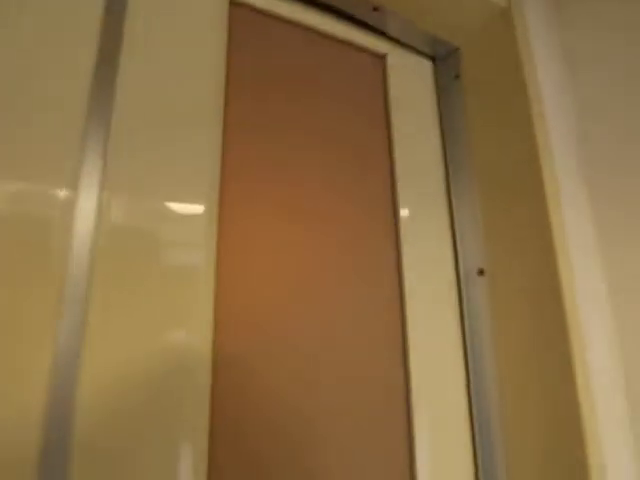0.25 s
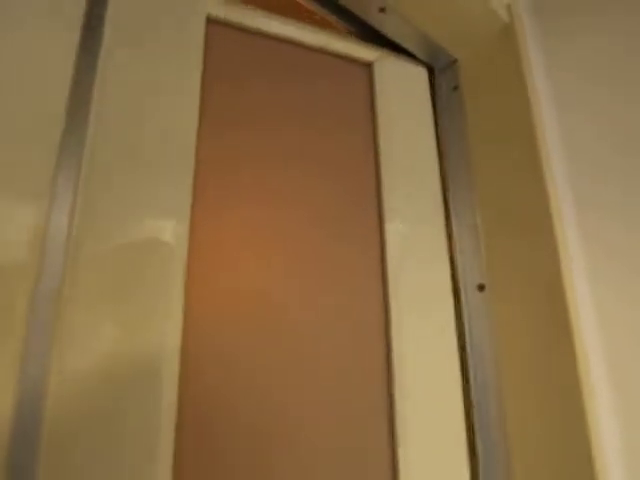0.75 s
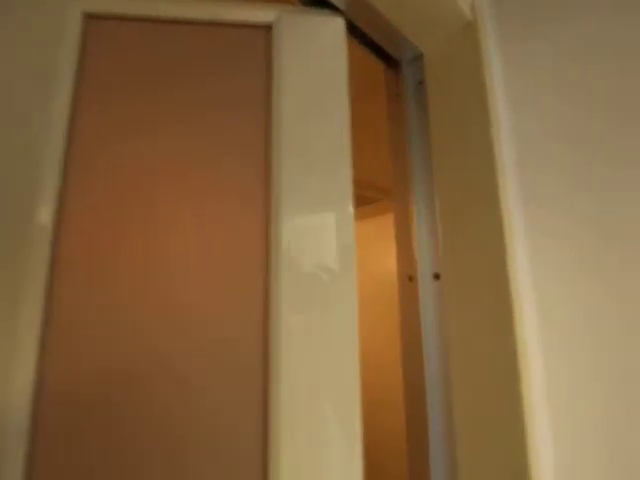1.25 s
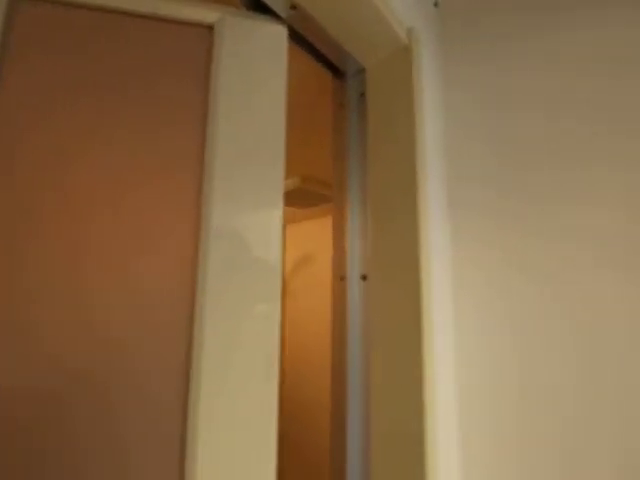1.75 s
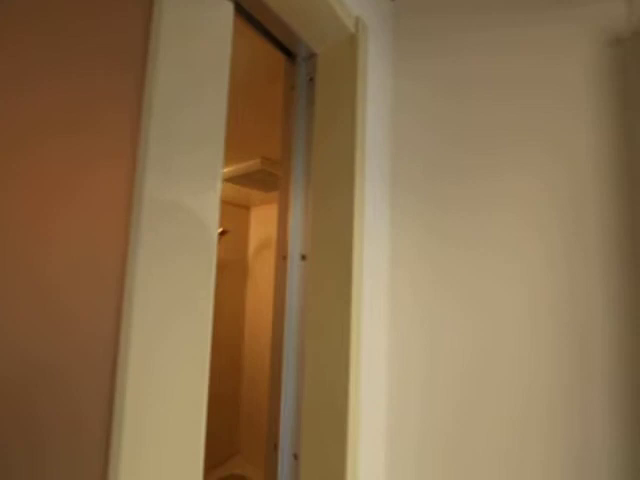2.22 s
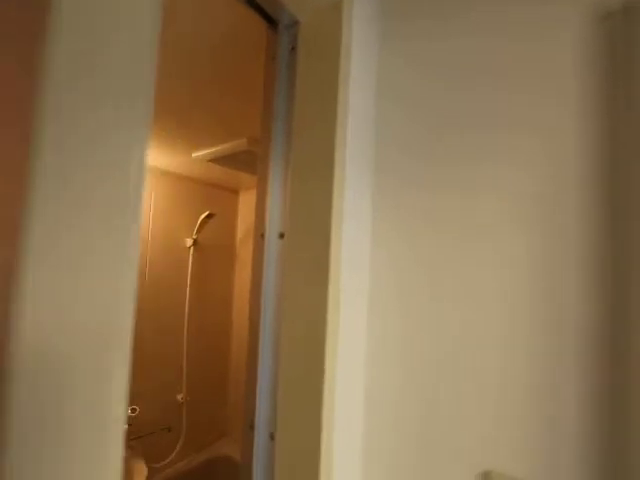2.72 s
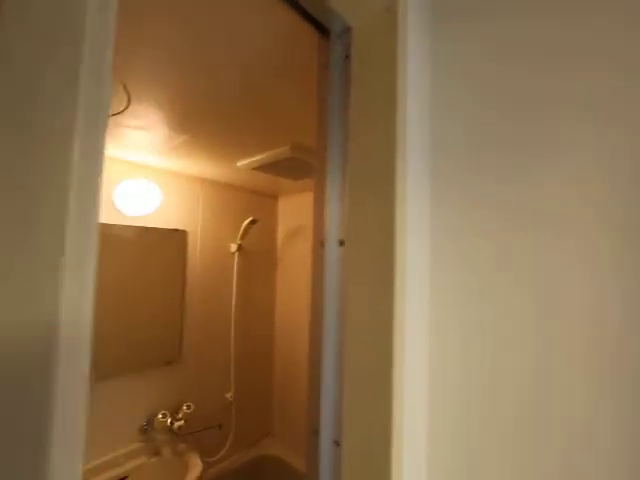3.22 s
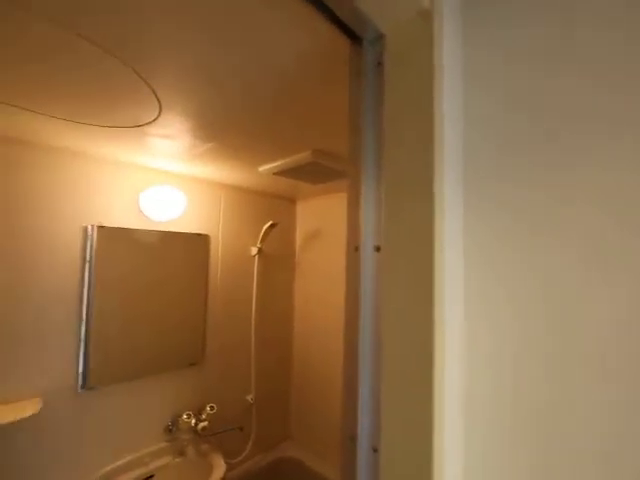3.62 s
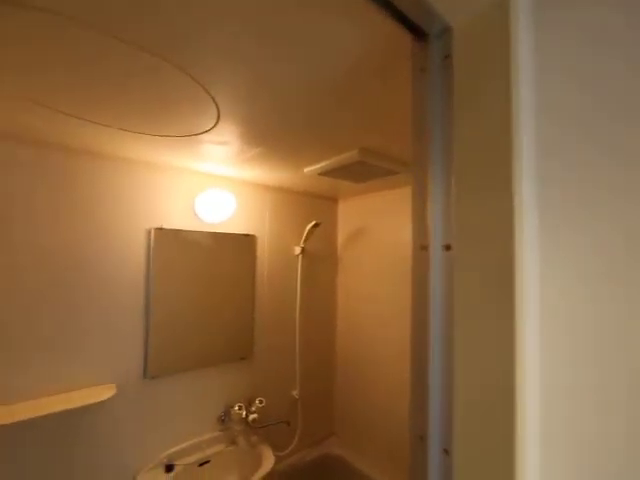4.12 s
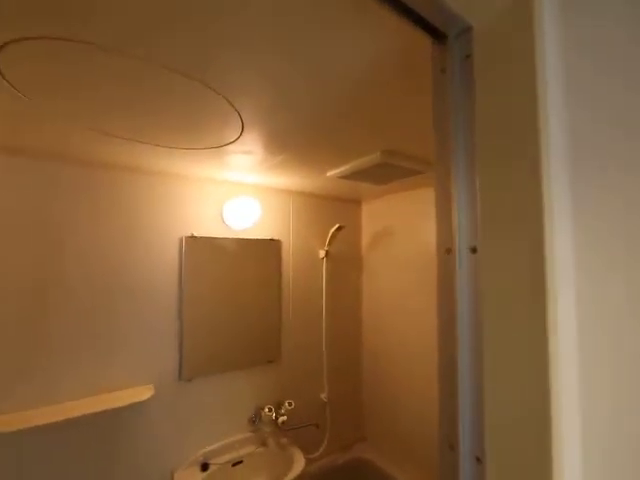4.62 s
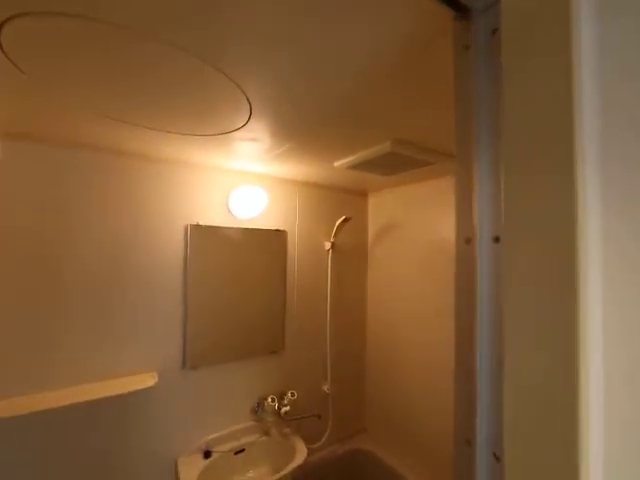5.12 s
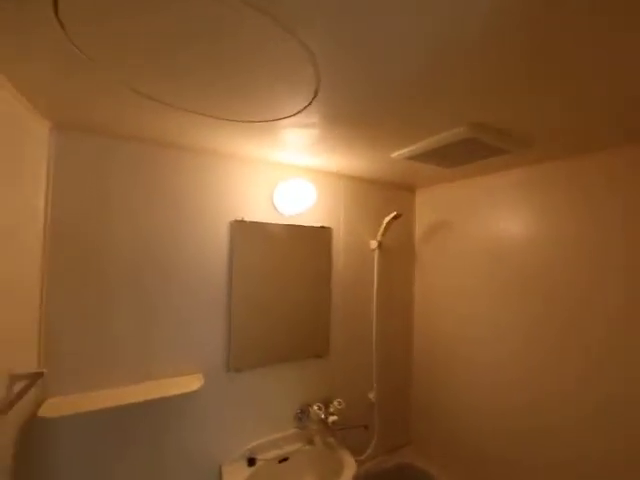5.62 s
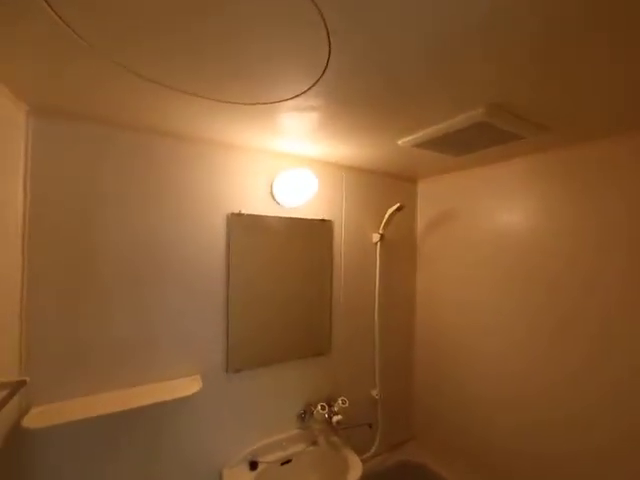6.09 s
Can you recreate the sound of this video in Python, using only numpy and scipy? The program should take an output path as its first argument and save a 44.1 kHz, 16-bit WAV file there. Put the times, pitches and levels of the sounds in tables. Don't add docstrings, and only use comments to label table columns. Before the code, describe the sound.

Latch scuff and booming air bumps, a pause, then an accelerating hollow rattle of a sliding door over soft fan hum, ending with dry handling clicks.

```python
import sys
import numpy as np
from scipy import signal
from scipy.fft import rfft, irfft
from scipy.io import wavfile
from scipy.ndimage import uniform_filter1d

SR = 44100
rng = np.random.default_rng(int(sys.argv[2]) if len(sys.argv) > 2 else 0)


def store_pcm(level_fs):
    pcm = np.round(np.clip(level_fs, -1, 1) * 32767).astype(np.int16)
    wavfile.write(sys.argv[1], SR, np.atleast_2d(pcm).T)


def invert_db(level):
    return 10 ** (np.asarray(level, dtype=float) / 20)


N = 280035

# [t/s, peak level/dB, track ring f/Hz, treble tick level re peak/dB]
TUG_KNOCKS = [(0.8958, -16, 1950, -20), (0.9501, -11, 1950, -34), (0.9983, -13.5, 1950, -18),
              (1.043, -12, 2040, -20), (1.0945, -11, 1940, -16.5), (1.1478, -8.5, 2440, -17),
              (1.2186, -14, 1230, -17)]
SLOW_KNOCKS = [(2.045, -52, 1097, -30), (2.074, -35, 1280, -33), (2.421, -11.5, 1950, -15),
               (2.4267, -14.5, 1510, -18), (2.5606, -9.5, 1810, -20.5), (2.6469, -14.5, 1940, -16.5),
               (2.7228, -16, 1800, -18), (2.7994, -9, 1240, -15), (2.8639, -5, 2170, -18),
               (2.9263, -7.5, 2120, -12), (2.9831, -7.5, 2150, -13.5), (3.046, -12.5, 2000, -31),
               (3.106, -11.5, 2070, -20), (3.1657, -9.5, 2100, -17.5), (3.228, -14.5, 2070, -20)]
FAST_KNOCKS = [(3.285, -12, 1550, -12.5), (3.335, -16, 1650, -8), (3.377, -6, 1550, -30),
               (3.419, -15.5, 1410, -19), (3.457, -10, 1460, -14.5), (3.492, -6.5, 1600, -18),
               (3.525, -13, 1490, -11), (3.5576, -5, 1980, -19), (3.5888, -9.5, 2340, -19),
               (3.621, -5, 2190, -16), (3.65, -8.5, 2180, -19), (3.68, -5.5, 1850, -15.5),
               (3.708, -14, 1900, -27), (3.7399, -8, 1800, -20), (3.769, -5.5, 1980, -20),
               (3.801, -9.5, 2020, -19), (3.832, -10.5, 1800, -21), (3.8642, -18.5, 1840, -28),
               (3.901, -10.5, 1940, -24), (3.9423, -8.5, 1880, -17), (3.9839, -9.5, 1860, -13.5),
               (4.082, -10.5, 1900, -21), (4.145, -8.5, 1810, -17), (4.2235, -14.5, 1770, -17),
               (4.513, -33.5, 2300, -24)]
KNOCKS = TUG_KNOCKS + SLOW_KNOCKS + FAST_KNOCKS
# [f/Hz, level/dB, t60/s]
SPAN_SHUT = [(1220, -10, 0.034), (1290, -5, 0.045), (1795, -8.5, 0.038), (1950, -0.5, 0.039),
             (2170, -3, 0.041), (2430, -4, 0.059), (2840, -14, 0.027), (3880, -14, 0.019)]
SPAN_AJAR = [(1290, -5.5, 0.034), (1460, -5.5, 0.024), (1750, -2, 0.038), (1980, -1, 0.028),
             (2140, 1.5, 0.02), (2440, -5, 0.023), (2700, -5, 0.027), (3170, -10, 0.013)]
SPAN_HALF = [(1090, -9, .03), (1417, 3, 0.04), (1650, 5.5, 0.042), (1900, -23, 0.041), (2100, 8, 0.022),
             (2300, -19, 0.034), (2980, -4.5, 0.025), (3920, -19, 0.016)]
SPAN_WIDE = [(1410, -17, 0.026), (1670, -2.5, 0.043), (1810, 3.5, 0.053), (1940, 3, 0.041),
             (2186, -2, 0.043), (2220, 5, 0.028), (2500, -22, 0.023), (2680, 0, 0.042)]
SPAN_OPEN = [(1275, -2.5, 0.039), (1510, -17, 0.021), (1740, 0.5, 0.043), (1810, 4, 0.07), (1940, -1, 0.04),
             (2260, -7, 0.026), (2280, -3.5, 0.045), (2710, -16, 0.026)]
SPANS = [SPAN_SHUT, SPAN_AJAR, SPAN_HALF, SPAN_WIDE, SPAN_OPEN]
SPAN_ENDS = [2.3, 3.02, 3.54, 3.79]
TICK_BAND = [2500, 7500]
# [t/s, level/dB]
WALL_ECHOES = [(.008, -9), (.0125, -17), (.017, -19)]

# [t/s, grind level/dB]
PULLS = [
    [(.1, -82), (.115, -25), (.18, -34.5), (.25, -37.5), (.32, -72), (.41, -60), (.5, -41)],
    [(.5, -47), (.58, -33), (.64, -36.5), (.74, -58), (.79, -67), (.89, -34.5), (.95, -40), (1.16, -27.5),
     (1.5, -47.5)],
    [(2.0, -80), (2.05, -43), (2.1, -49.5), (2.26, -50.5)],
    [(2.26, -47), (2.33, -26.5), (2.395, -32), (2.415, -21), (2.5, -28.5), (2.74, -27.5), (2.82, -21),
     (3.0, -24.5), (3.15, -32.5)],
    [(3.15, -30), (3.38, -25.5), (3.6, -23.5), (3.75, -28.5), (4.0, -25), (4.15, -27.5), (4.27, -28.5),
     (4.42, -48)],
]
# [t/s, length/s, panel boom level/dB, sway level/dB]
LURCHES = [(.1, 0.21, -66, -42), (.53, 0.14, -31.5, -39), (.61, 0.21, -25.5, -15.5),
           (.86, 0.12, -19.5, -19.5), (1.0, 0.11, -57, -29), (1.15, 0.25, -44, -50), (.4, 0.36, -43, -46),
           (2.01, 0.37, -47, -54), (2.27, 0.13, -35, -33.5), (2.4, 0.28, -35.5, -31.5),
           (2.6, 0.12, -35, -32.5), (2.76, 0.094, -37, -28.5), (2.81, 0.14, -28, -30),
           (2.95, 0.39, -37, -52), (3.25, 0.49, -36, -46), (3.55, 0.45, -34.5, -57), (3.8, 0.48, -39, -65)]
# [f/Hz, level per Hz/dB]
GRIND_SPECTRUM = [(150, -4.5), (250, -1.5), (442, 1), (747, 1.5), (1810, -1), (3010, -12), (6280, -26),
                  (11700, -93)]
BOOM_SPECTRUM = [(35, -49), (60, -43), (110, 7), (204, -6), (312, -16), (500, -6.5), (650, -109),
                 (1100, -120)]
SWAY_SPECTRUM = [(10, -21), (25, 9.5), (50, 0), (75, 13), (120, -29), (400, -90)]
SEAL_SPECTRUM = [(2060, -22), (3500, -3.5), (5300, -0.5), (7600, -6.5), (9000, -12), (11000, -15.5),
                 (15600, -20), (16700, -40)]

# [t/s, peak level/dB, f/Hz, negative when it starts with a pull]
THUMPS = [(0.622, -13, 109), (0.645, -9, 110), (.666, -10, 154), (0.677, -7, 281), (0.682, -2, -115),
          (0.6988, -1.5, -170), (.707, -10, 149), (0.723, 0.5, 162), (0.7434, -5, -125), (0.733, -7, 144),
          (0.755, -7.5, -130), (0.771, -27, 119), (0.829, -14, 99), (0.857, -21, 150), (0.875, -3.5, 164),
          (0.885, -30, 253), (0.893, -7.5, 165), (0.906, -8, 114), (0.918, -10, 136), (0.927, -7, 155),
          (0.961, -15.5, 131), (0.988, -13, 219), (0.997, -9, 141), (1.017, -24, 110), (1.088, -18, 126),
          (2.022, -34, 104), (2.299, -31, 89), (2.41, -20, 211), (2.42, -20, 126), (2.434, -12, 97),
          (2.445, -26, 109), (2.405, -21, 303), (2.422, -19, 260), (2.43, -20, 327), (0.7239, -8.5, 412),
          (0.746, -12, 360), (0.707, -7.5, 332)]
# [t/s, peak level/dB, centre f/Hz]
TICKS = [(0.099, -17.5, 12600), (0.11, -16.5, 3100), (0.139, -24, 4100), (0.166, -34, 3180),
         (0.186, -21, 4500), (0.24, -19, 4000), (0.28, -19, 5100), (0.28, -17, 4900), (0.419, -30, 4600),
         (0.4544, -49, 3590), (0.4923, -32, 3600), (0.54, -30, 3460), (0.558, -26, 3700),
         (0.629, -22, 4100), (0.7128, -21, 4300), (0.88, -27, 3400), (0.7435, -36, 9700),
         (.998, -30, 13500), (0.97, -36, 13000), (3.6, -27, 7800), (3.3, -25, 8600), (0.93, -19, 5600),
         (0.76, -22, 6400), (.864, -30, 6400), (.936, -28, 8000), (.713, -40, 12500), (.56, -36, 9000),
         (2.419, -25, 9300), (0.95, -7.5, 3640), (0.8958, -14.5, 3800), (2.338, -30, 1600),
         (2.315, -34, 1300), (2.2, -22, 1200), (2.968, -28, 10000), (4.028, -24, 1600), (4.32, -25, 1190),
         (2.8, -35, 10500), (3.456, -32, 9000), (4.146, -37, 13000), (4.224, -36, 14000),
         (2.56, -41, 12000), (2.6244, -19, 4100), (2.836, -24, 2800), (0.951, -39, 13000),
         (1.095, -29, 19000), (1.147, -29, 17000), (2.864, -31, 16000), (2.927, -20, 15000),
         (2.984, -28, 14000), (3.284, -20, 12000), (3.335, -24, 9400), (3.378, -6.5, 3340),
         (3.984, -19, 9600), (0.16, -25, 11000), (0.5, -36, 12500), (0.495, -36, 8000),
         (0.534, -29.5, 6500), (0.423, -34, 10000), (2.47, -35, 12000), (2.485, -39, 11000),
         (2.029, -34, 1000), (2.09, -43, 1500), (2.17, -37, 1600), (2, -33, 870)]
# [t/s, peak level/dB, centre f/Hz]
SCUFFS = [(0.115, -13.5, 1290), (0.116, -39, 483), (.21, -21.5, 460), (0.12, -19.5, 1000),
          (0.142, -30, 1460), (.186, -16, 1480), (0.2, -16, 1250), (0.579, -19, 1480), (0.631, -17.5, 840),
          (.65, -11.5, 900)]

# [t/s, peak level/dB, low ring level re peak/dB]
CLICKS = [(5.425, -27.5, -9), (5.441, -46, -16), (5.452, -47, -14), (5.462, -43, -14), (5.49, -43, -8),
          (5.475, -31, -4), (5.483, -39, -18), (5.5, -39, 5), (5.508, -38, -18), (5.515, -31.5, 1.5),
          (5.534, -40, 3), (5.55, -49, -14), (5.565, -21.5, -5.5), (5.645, -13, -9.5), (5.651, -18, -6),
          (5.66, -17.5, -9), (5.673, -16.5, -10), (5.728, -9, -13), (5.741, -29.5, 6.5), (5.957, -34.5, -4)]
# [f/Hz, level/dB, t60/s]
CASE_MODES = [(1000, 23, 0.022), (770, 25.5, 0.0083), (1410, 1, 0.035), (1650, -17, 0.012), (2230, 3, 0.03),
              (2520, -26, 0.014), (2780, 4, 0.02), (3720, -15, 0.02), (3970, 2, 0.014), (4270, -17, 0.018),
              (5900, -38, .007)]
CASE_LOW_MODES = [(272.4, -1, 0.067), (151, -12.5, 0.21)]
# [t/s, length/s, body level/dB, hiss level/dB, skin squeak level/dB]
RUBS = [(.1, 0.37, -62, -62, -46), (.22, 0.12, -42, -43, -50), (.39, 0.12, -61, -55, -49.5),
        (.6, 0.22, -40, -57, -40), (4.42, 0.45, -50, -84, -89), (4.72, 0.25, -55, -54, -56),
        (5.28, 0.17, -60, -54, -53), (5.38, 0.084, -64, -50.5, -47), (5.41, 0.19, -46, -61, -54),
        (5.71, 0.084, -42.5, -62, -71), (5.94, 0.098, -48.5, -56.5, -52), (5.97, 0.26, -51.5, -56, -51.5),
        (6.08, 0.48, -47, -67, -57.5)]
# [f/Hz, level per Hz/dB]
CLOTH_SPECTRUM = [(150, -47), (250, -36), (339, -6), (570, -15), (838, -1), (6000, -31), (7800, -50),
                  (13200, -120)]
SWISH_SPECTRUM = [(2000, -19), (4000, 2.5), (8000, -1.5), (12000, -10), (15500, -22), (16500, -50)]
SQUEAK_SPECTRUM = [(800, -48), (1800, -4), (2150, -5), (2600, -7.5), (3300, -10.5), (3700, -20),
                   (9000, -56)]
# [t/s, length/s, peak level/dB, start f/Hz, end f/Hz]
GROANS = [
    (4.464, 0.22, -47, 270.3, 271),
    (5.763, 0.058, -40, 200, 190),
    (5.819, 0.058, -41.5, 270, 232),
    (5.902, 0.11, -47.5, 214, 197),
]
# [t/s, length/s, level/dB, centre f/Hz]
CREAKS = [(.631, .07, -28, 110), (2.723, .009, -43, 6400), (2.833, .008, -41, 7300),
          (3.046, .025, -50, 5200), (3.107, .025, -50, 5150), (4.224, .012, -49, 7400),
          (5.291, .1, -54, 2080), (5.391, .035, -52, 2300), (5.426, .09, -47, 985), (5.786, .04, -55, 430)]

# [t/s, air level/dB, hum level/dB]
FAN = [(-.1, -45, -51.5), (1.6, -47.5, -49.5), (4.5, -47, -46.5), (5.5, -47, -47.5), (6.5, -45, -52.5)]
# [f/Hz, level per Hz/dB]
AIR_SPECTRUM = [(12, -54), (20, -19), (60, -18.5), (91, -4.5), (270, -13.5), (690, -16), (1950, -26),
                (15200, -39.5)]
# [f/Hz, t60/s]
ROOM_DECAY = [(100, 1.2), (300, 1.47), (800, 1.12), (2000, 0.92), (5000, 0.38), (12000, 0.55)]


def roller():
    near, far, t = np.zeros(N), np.zeros(N), np.arange(900) / SR
    near_db, near_octaves = 2.0, .18
    mode_spread_db, phase_spread = 1.5, .12
    bounce_s, rattle_db = .00155, -10
    rattle_band = signal.butter(2, [1300, 2700], "band", fs=SR)
    tick_band = signal.butter(2, TICK_BAND, "band", fs=SR)
    onset = 1 - np.exp(-(t / .00015) ** 2)
    contact = (np.exp(-(t / .0048) ** 3) + .3 * np.exp(-t / .005)) * onset
    for s, db, hz, tick_db in KNOCKS:
        span = SPANS[np.searchsorted(SPAN_ENDS, s)]
        luck = rng.standard_normal((len(span), 2))
        struck = []
        for (f, level_db, t60), chance in zip(span, luck[:, 0]):
            nearness = np.exp(-(np.log2(f / hz) / near_octaves) ** 2)
            struck.append((f, level_db + near_db * nearness + mode_spread_db * chance, t60))
        knock = peaked(ring(struck, t, phase_spread * luck[:, 1]) * contact, 0)
        lag = round(round(bounce_s * hz) / hz * rng.uniform(.98, 1.02) * SR)
        knock = peaked(knock + 0.5 * np.roll(knock, lag) * (t >= lag / SR), db)
        rattle = peaked(signal.lfilter(*rattle_band, rng.standard_normal(len(t)) * contact), db)
        knock += invert_db(rattle_db) * rattle
        add(far, s, rattle + invert_db(-9.5) * knock)
        tick = signal.lfilter(*tick_band, rng.standard_normal(len(t)) * contact)
        knock += peaked(tick, db + tick_db + 4.0)
        top = np.diff(rng.standard_normal(len(t) + 1)) * contact
        knock += peaked(top, db + 2.0 * tick_db - 14.0)
        add(near, s + 0.00019, knock)
        for late_s, echo_db in WALL_ECHOES:
            echo = invert_db(echo_db) * (knock + rattle * invert_db(-16))
            add(near, s + late_s * rng.uniform(.88, 1.08), echo)
    return near, far


def slide():
    boom_db, sway_db, seal_db = -14.5, -54, -12
    firm_db, seal_power = -19.5, 1.24
    usual_turns_per_s, seal_db_per_octave = 18, 5
    grind = np.max([levels(pull)[0] for pull in PULLS], axis=0)
    grind = uniform_filter1d(grind, size=300)
    boom, sway = swells(LURCHES) + grind * invert_db(np.array([[boom_db], [sway_db]]))
    speed_db = seal_db_per_octave * np.log2(turns_per_s() / usual_turns_per_s)
    hiss = (grind / invert_db(firm_db)) ** seal_power * invert_db(firm_db + seal_db + speed_db)
    hiss = uniform_filter1d(hiss, size=2400, origin=800)
    rough = grind * flutter(14, 1.8) * colour(grit(7000, 1.9), GRIND_SPECTRUM)
    seal = hiss * flutter(60, 1.84) * colour(grit(5000, 1.2), SEAL_SPECTRUM)
    shake, swing = rng.standard_normal((2, N))
    panel = boom * flutter(15, 1.2) * colour(shake, BOOM_SPECTRUM)
    return rough + seal, panel + sway * colour(swing, SWAY_SPECTRUM)


def turns_per_s():
    s = np.array([row[0] for row in KNOCKS])
    rate = np.clip(1 / np.diff(s), 7, 40)
    return uniform_filter1d(np.interp(np.arange(N) / SR, s[1:], rate), size=4000)


def thumps():
    out, t = np.zeros(N), np.arange(3000) / SR
    for s, db, hz in THUMPS:
        turns = hz * (t + 0.0016 * (1 - np.exp(-t / 0.0031)))
        rise = 1 - np.exp(-(turns / 0.31) ** 2)
        fall = np.exp(-(abs(turns) / 1.08) ** 1.88)
        add(out, s + 0.00041, peaked(np.sin(2 * np.pi * turns) * rise * fall, db))
    return out


def latch():
    out, t = np.zeros(N), np.arange(1200) / SR
    for s, db, hz in TICKS + SCUFFS:
        t60 = 0.042 * min(1, 5500 / hz)
        puff = rng.standard_normal(len(t)) * invert_db(-60 * t / t60)
        band = signal.butter(1, [0.82 * hz, min(1.09 * hz, .45 * SR)], "band", fs=SR)
        add(out, s, peaked(signal.lfilter(*band, puff), db - 6.5))
    return out


def case():
    out, t = np.zeros(N), np.arange(8000) / SR
    hard_tilt = 0.44
    for s, db, low_db in CLICKS:
        bend = rng.uniform(0.99, 1.02)
        tilt = hard_tilt * (db + 12)
        struck = [(hz, level_db + tilt * np.log2(hz / 1000), t60) for hz, level_db, t60 in CASE_MODES]
        click = -ring(struck, bend * t) * (1 - np.exp(-(t / 0.00028) ** 2))
        click[110:] += 0.018 * click[:-110]
        snap = uniform_filter1d(rng.standard_normal(len(t)), size=3)
        snap = snap * np.exp(-t / 0.0015) * invert_db(2.7 * db - 2.5)
        low = invert_db(db + low_db) * ring(CASE_LOW_MODES, bend * t) * (1 - np.exp(-t / 0.0015))
        add(out, s + 0.00098, peaked(click, db + 1.5) + low + snap)
    return out


def rustle():
    body, hiss, squeak = swells(RUBS)
    cloth = body * flutter(25, 0.49) * colour(grit(8000, 0.69), CLOTH_SPECTRUM)
    swish = hiss * colour(grit(8000, 0.72), SWISH_SPECTRUM)
    skin = squeak * flutter(30, 1.6) * colour(rng.standard_normal(N), SQUEAK_SPECTRUM)
    return cloth + swish + skin


def groans():
    out = np.zeros(N)
    for s, length, db, start_hz, end_hz in GROANS:
        hz = np.linspace(start_hz, end_hz, round(length * SR))
        tone = np.sin(2 * np.pi * np.cumsum(hz) / SR)
        add(out, s, invert_db(db) * tone * signal.windows.tukey(len(hz), .7))
    return out * uniform_filter1d(flutter(60, 6), size=200)


def creaks():
    out, width = np.zeros(N), .06
    for s, length, db, hz in CREAKS:
        band = signal.butter(2, [hz * (1 - width) - 15, hz * (1 + width) + 15], "band", fs=SR)
        rub = evened(signal.lfilter(*band, rng.standard_normal(8000)))
        rub = rub[-round(length * SR):]
        add(out, s, invert_db(db) * rub * signal.windows.tukey(len(rub), .6))
    return out


def fan():
    air, hum = levels(FAN)
    hum_hz, hum_width_hz = 119.5, 3
    r = np.exp(-np.pi * hum_width_hz / SR)
    drift = rng.standard_normal(N) + 1j * rng.standard_normal(N)
    waver = 4.8 + signal.lfilter([np.sqrt(1 - r ** 2)], [1, -r], drift)
    tone = evened((waver * np.exp(2j * np.pi * hum_hz * np.arange(N) / SR)).real)
    return air * flutter(15, 0.4) * colour(rng.standard_normal(N), AIR_SPECTRUM) + hum * tone


def room(x):
    turn = 2 * np.pi * 3.7 * np.arange(N) / SR
    return sum(signal.fftconvolve(x * share, tail())[:N] for share in (np.cos(turn), np.sin(turn)))


def tail():
    taps = np.zeros(SR)
    at = np.arange(260, SR - 20, 20)
    taps[at + rng.integers(0, 20, len(at))] = rng.choice([-1., 1.], len(at))
    hz, t, z = signal.stft(taps, SR, nperseg=256)
    decay = invert_db(-60 * t / read(ROOM_DECAY, hz)[:, None])
    echo = signal.istft(z * decay, SR, nperseg=256)[1]
    return echo / np.linalg.norm(echo)


def ring(modes, t, phases=None):
    phases = np.zeros(len(modes)) if phases is None else phases
    out = 0
    for (hz, db, t60), phase in zip(modes, phases):
        out = out + invert_db(db - 60 * t / t60) * np.sin(2 * np.pi * (hz * t + phase))
    return out


def grit(per_s, spread_db):
    size = invert_db(spread_db * np.minimum(rng.exponential(1, N), 4)) * rng.standard_normal(N)
    return size * (rng.random(N) < per_s / SR)


def flutter(hz, depth_db):
    wobble = signal.lfilter([1], [1, -np.exp(-2 * np.pi * hz / SR)], rng.standard_normal(N))
    return invert_db(depth_db * evened(wobble))


def colour(x, points):
    gain = invert_db(read(points, np.fft.rfftfreq(len(x), 1 / SR)))
    return evened(irfft(rfft(x) * gain, len(x)))


def read(points, hz):
    f, value = np.transpose(points)
    return np.interp(np.log(hz + 1), np.log(f + 1), value)


def levels(rows):
    s, *columns = np.transpose(rows)
    return [invert_db(np.interp(np.arange(N) / SR, s, c, -200, -200)) for c in columns]


def swells(rows):
    rise, fall = .22, .5
    out = np.zeros((len(rows[0]) - 2, N))
    for s, length, *columns in rows:
        along = np.arange(0, length, 1 / SR) / length
        shape = np.interp(along, [0, rise, 1 - fall, 1], [0, 1, 1, 0]) ** 2
        for gain, db in zip(out, columns):
            add(gain, s, invert_db(db) * shape)
    return out


def evened(x):
    return x / np.sqrt(np.mean(x ** 2) + 1e-20)


def peaked(x, db):
    return invert_db(db) * x / abs(x).max()


def add(mix, s, sound):
    part = mix[round(s * SR):][:len(sound)]
    part += sound[:len(part)]


def ducking(x):
    from_db, share, recover_db_per_s = -15, 0.31, 60
    power_db = 10 * np.log10(abs(uniform_filter1d(x ** 2, size=900)) + 1e-12)
    climb = np.arange(N) * recover_db_per_s / SR
    held_db = np.maximum.accumulate(power_db + climb) - climb
    over_db = np.maximum(held_db - from_db, 0)
    return invert_db(-share * uniform_filter1d(over_db, size=200))


def scene():
    knocks, far = roller()
    ticks = latch()
    scrape, boom = slide()
    wet = room(invert_db(-10.0) * far + invert_db(-5.0) * ticks + invert_db(-8.5) * scrape + invert_db(-9.5) * boom)
    push = thumps()
    door = knocks + ticks + invert_db(-3.5) * scrape + boom + wet
    rest = door + case() + rustle() + fan() + groans() + creaks()
    return (push + rest * ducking(push))[None]


def top_cut(x):
    return signal.sosfilt(signal.butter(12, 16820, fs=SR, output="sos"), x)


def record(dry):
    low_hz, high_hz = 27.2, 15780
    x = signal.lfilter(*signal.butter(1, low_hz, "high", fs=SR), dry)
    x = signal.oaconvolve(x, signal.firwin(1501, high_hz, fs=SR)[None], "same")
    mix = x / (1 + abs(x) ** 8) ** (1 / 8)
    return top_cut(mix)


dry = scene()
out = record(dry)
store_pcm(out)
```